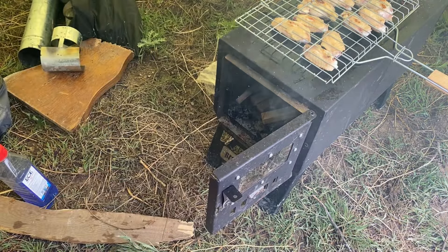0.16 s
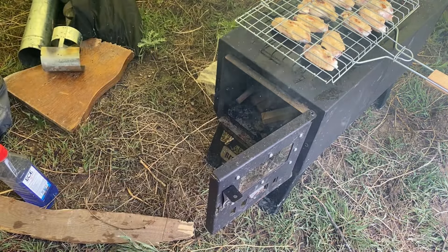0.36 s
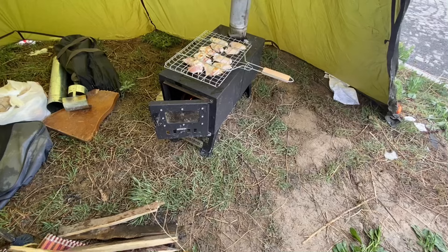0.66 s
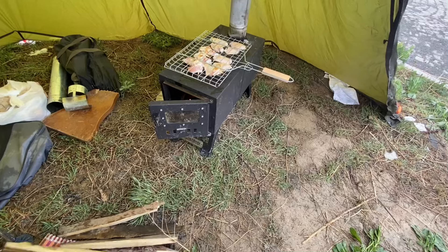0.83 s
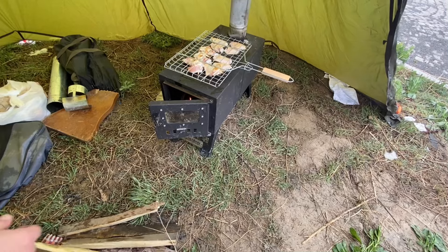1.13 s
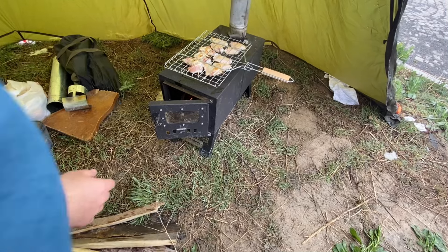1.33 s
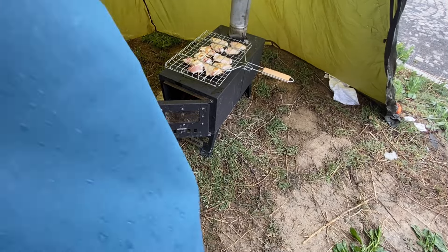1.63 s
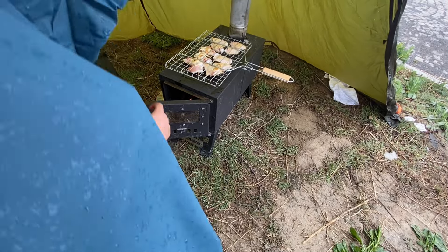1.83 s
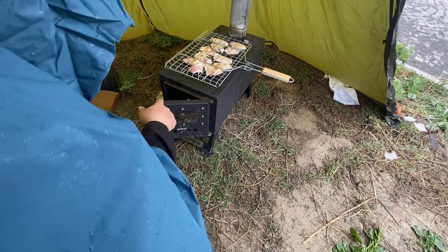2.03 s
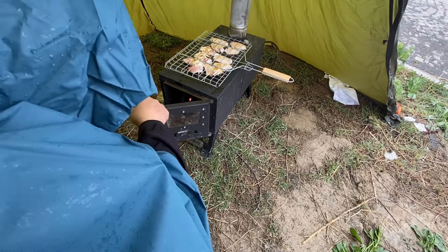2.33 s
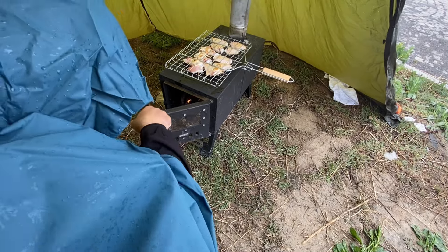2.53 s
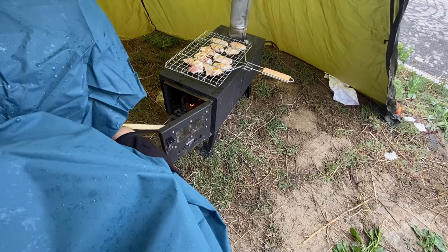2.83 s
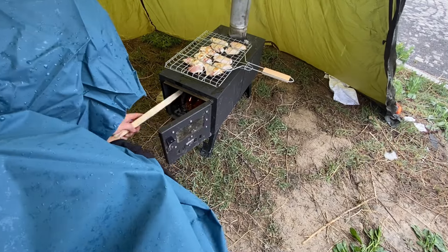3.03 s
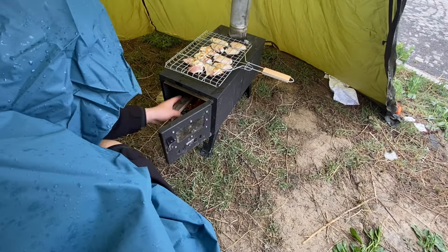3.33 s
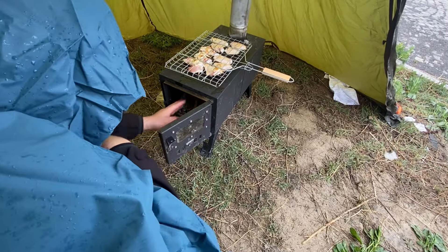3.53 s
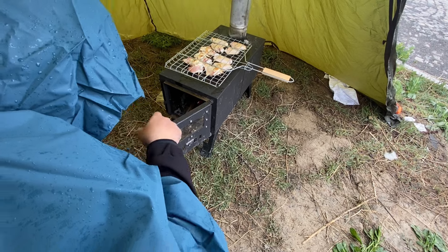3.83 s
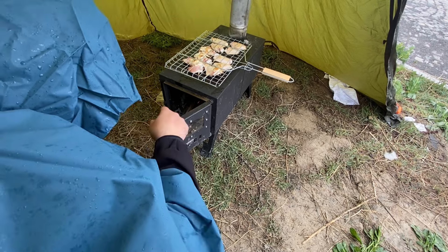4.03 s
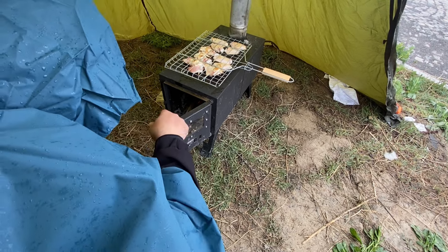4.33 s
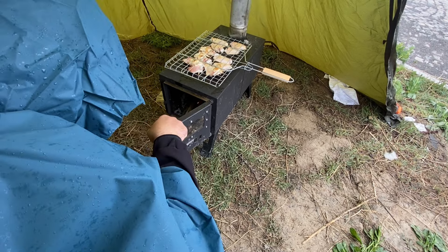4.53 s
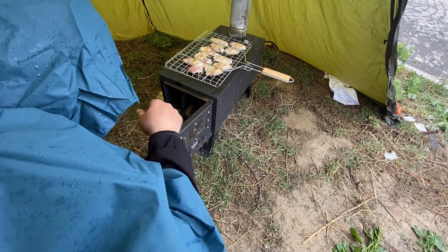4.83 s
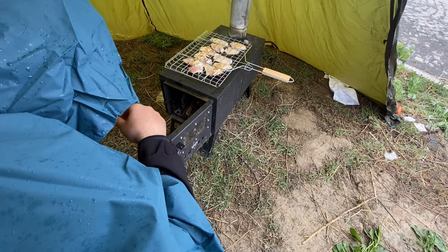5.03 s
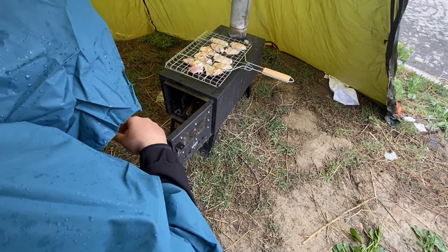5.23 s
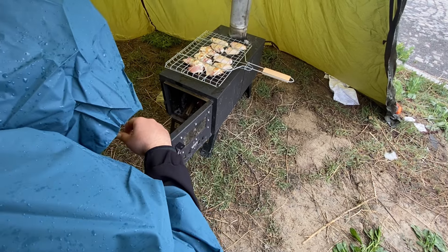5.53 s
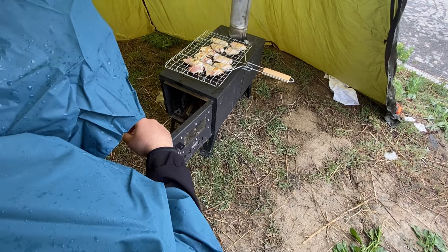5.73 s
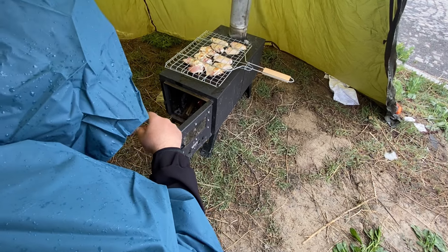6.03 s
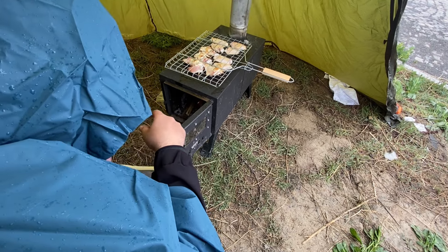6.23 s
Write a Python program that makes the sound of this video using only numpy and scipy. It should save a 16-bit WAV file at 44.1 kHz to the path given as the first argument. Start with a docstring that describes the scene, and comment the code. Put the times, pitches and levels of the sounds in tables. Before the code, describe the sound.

A very quiet opening of distant rain, with faint ticks on a tent, gives way abruptly at half a second to close, bright rain. Fat drops smack a stiff rain jacket amid fine patter and hiss. The jacket rustles and its folds snap as the wearer crouches; later a stick scrapes faintly and padded knocks sound on a hollow stove. Outdoors, close stereo camera microphone with soft handling bumps.

```python
"""Campsite: rain on a tent and on the rain jacket of someone who crouches to feed a small camp stove.
After a hush of distant rain it is close: bursting drops smack the jacket over random patter and noise hiss.
The jacket rustles as filtered noise, creases and snaps; moves shake the camera into rumble and soft bumps.
A hollow body, a bank of decaying modes, is knocked and rubbed; a stick of firewood scrapes briefly."""
import sys
import numpy as np
from scipy import signal
from scipy.fft import rfft, irfft, next_fast_len
from scipy.io import wavfile
from scipy.ndimage import uniform_filter1d, map_coordinates

SR = 44100
rng = np.random.default_rng(int(sys.argv[2]) if len(sys.argv) > 2 else 0)


def file_out(sig):
    """Save sig as 16-bit WAV at sys.argv[1]."""
    # one column per channel
    cols = np.atleast_2d(sig).T
    # limit, then scale
    lim = np.clip(cols, -1, 1)
    pcm = np.round(lim * 32767).astype(np.int16)
    wavfile.write(sys.argv[1], SR, pcm)


N = 281358
TIME = np.arange(N) / SR
RAIN_START_S = 0.56

# Small drops on cloth, spectrum. Each row: frequency in Hz, relative level in dB.
PATTER_SPECTRUM = [(200, -28.5), (700, -12.5), (1500, -7), (2500, -5.5), (5000, -2.5), (7400, 7), (9200, 1),
                   (12000, 0), (13200, -11), (16000, 1)]
# Sliding jacket cloth, spectrum. Each row: frequency in Hz, relative level in dB.
CLOTH_SPECTRUM = [(60, -75), (150, -2), (330, 3), (700, 4), (1100, 2.5), (1500, -3.5), (2500, -8),
                  (5000, -12.5), (12000, -89)]
# The wearer steps in, crouches and reaches for the stove. Each row: start in seconds, length in seconds,
# relative cloth level in dB, relative camera rumble level in dB.
MOVES = [(0.38, .12, -88, -59), (0.559, 0.2, -39, -58), (0.981, 0.13, -44, -55.5), (1.313, 0.64, -46, -57),
         (1.886, 0.068, -59, -71), (2.124, 0.14, -50, -64.5), (2.56, 0.08, -58, -85.5),
         (3.45, 0.22, -65, -62), (3.995, 0.41, -73, -64), (5.813, .11, -58.5, -62), (5.98, .3, -65, -68),
         (6.236, .16, -57.5, -57)]
# Modes of the hollow body. Each row: frequency in Hz, relative level in dB, t60 in seconds.
HOLLOW_MODES = [(67.3, -28, 0.43), (103, 3, 0.27), (125, 9.5, 0.14), (134, -1.5, 0.47), (179.9, 3, 0.4),
                (220, -14, 0.087), (262.3, -7.5, 0.76), (305, -2.5, 0.19), (339.4, -10.5, 0.71),
                (438, -27, 0.76)]


def amp(db):
    """Decibels to gain."""
    return 10 ** (np.asarray(db) / 20)


def unit(x):
    """Scales to rms 1."""
    return x / np.sqrt(np.mean(x ** 2) + 1e-20)


def read(points, hz):
    """Reads a spectrum on a log-frequency axis."""
    f, value = np.transpose(points)
    return np.interp(np.log(hz + 1), np.log(f), value)


def add(mix, s, sound):
    """Adds a stereo sound at time s."""
    part = mix[:, round(s * SR):][:, :sound.shape[-1]]
    part += sound[..., :part.shape[-1]]


def colour(x, points, size=2048):
    """Minimum-phase filter with the given spectrum, so that clicks keep their edge."""
    log_gain = np.log(amp(read(points, np.fft.rfftfreq(size, 1 / SR))))
    circle = np.concatenate([log_gain, log_gain[-2:0:-1]])
    taps = np.fft.ifft(np.exp(np.conj(signal.hilbert(circle)))).real[:size // 2]
    return signal.oaconvolve(x, taps[None], axes=1)[:, :x.shape[1]]


def tinted(x, depth_db, count=22):
    """Each spot of cloth favours its own frequencies."""
    tint = [(hz, depth_db * rng.standard_normal()) for hz in np.geomspace(600, 13000, num=count)]
    return colour(x, tint)


def ports(x, side, lead_ms):
    """Two microphone ports: a balance by frequency, and the left one hears first."""
    hz = np.fft.rfftfreq(next_fast_len(N + 100), 1 / SR)
    tilt = amp(read(side, hz) / 2)
    lag = np.exp(-2j * np.pi * hz * lead_ms / 1000)
    return irfft(rfft(x, 2 * (len(hz) - 1)) * np.array([tilt, lag / tilt]))[:, :N]


def noise_pair(same, size):
    """Two noises with a common share of power."""
    common, left, right = rng.standard_normal((3, size))
    same = np.clip(same, 0, 1)
    return np.sqrt(same) * common + np.sqrt(1 - same) * np.array([left, right])


def drift(per_s):
    """Random curve of rms 1: straight lines between per_s random values a second."""
    knots = rng.standard_normal(4096)
    return unit(map_coordinates(knots, [TIME * per_s], order=1, mode="wrap"))


def gesture(start, length, rise_s, fall_s):
    """Smooth attack, hold until the length is up, exponential release."""
    t = TIME - start
    rise = np.sin(np.pi / 2 * np.clip(t / rise_s, 0, 1)) ** 2
    return rise * np.exp(-np.maximum(t - length, 0) / fall_s)


def gestures(rows, rise_s, fall_s, rest_db=-120):
    """Gain of overlapping gestures (start, length, dB), summed in power over a resting level."""
    power = sum((amp(db) * gesture(s, length, rise_s, fall_s)) ** 2 for s, length, db in rows)
    return np.sqrt(amp(rest_db) ** 2 + power)


def wandering(x, depth_db, width_hz, hold_s, size=1024):
    """The colour of a steady sound wanders: narrow bands swell and sink at random."""
    hz, t, z = signal.stft(x, SR, nperseg=size)
    knots = rng.standard_normal((256, 256))
    at = np.meshgrid(hz / width_hz, t / hold_s, indexing="ij")
    field = map_coordinates(knots, at, order=1, mode="wrap")
    return signal.istft(z * unit(amp(depth_db * unit(field))), SR, nperseg=size)[1][:, :N]


def rain(rain_db=-44.5, hiss_db=-4, patter_db=-2, ticks_db=-8, flutter_db=1, waver_db=1.4, rise_s=0.098):
    """Hiss from tent and ground, patter, ticks and fat drops on the jacket; all but the last swell in flurries."""
    # Hiss spectrum. Each row: frequency in Hz, relative level in dB.
    hiss_spectrum = [(200, -13), (600, -23.5), (1550, -16.5), (2450, -6.5), (2730, -10), (3000, -2.5),
                     (3400, -9), (4400, -1), (6000, -3), (7400, 0.5), (9000, 1), (10000, -4.5), (12000, -7),
                     (13200, -41), (15500, -28)]
    # Stereo balance. Each row: frequency in Hz, left minus right in dB.
    rain_side = [(500, 4.5), (2000, -3.5), (5000, 1.5), (7000, 4), (9000, -5.5), (12000, -0.5),
                 (15000, -0.5)]
    # Flurries. Each row: start in seconds, length in seconds, level in dB relative to the steady fall.
    flurries = [(0.605, 0.34, 3.5), (1.047, .15, 0.5), (1.22, 0.17, 6.5), (1.462, 0.96, 1.5),
                (2.181, 0.051, 5), (2.312, 0.14, -1.5), (2.754, 0.39, 2), (4.036, 0.27, 4.5),
                (4.782, 0.66, 3), (5.596, 0.2, 2), (5.997, 0.23, 1)]
    hiss = unit(colour(noise_pair(0.13, N), hiss_spectrum)) * amp(flutter_db * drift(70))
    flurry_db = sum(db * gesture(s, length, rise_s=0.017, fall_s=0.025) for s, length, db in flurries)
    onset = np.clip((TIME - RAIN_START_S) / rise_s, 0, 1)
    strength = amp(rain_db + flurry_db + waver_db * drift(22)) * onset
    fine = reflected(amp(hiss_db) * hiss + amp(patter_db) * patter())
    fine = wandering(fine, depth_db=1.8, width_hz=230, hold_s=.12)
    return ports(fat_drops() + strength * (fine + amp(ticks_db) * ticks()), rain_side, lead_ms=0.034)


def fat_drops(splash_db=-24.5, slap_db=-12.5):
    """Near drops: a bright splash, and the slap of the cloth beneath it."""
    # Sharp ticks to long wet spatters. Each row: start in seconds, relative level in dB, left minus right in dB,
    # slap relative to splash in dB before slap_db and splash_db, burst length in seconds.
    drops = [(0.845, -19, 1.5, -18, 0.0089), (0.888, -18.5, 1, -20.5, 0.0087),
             (0.992, -21.5, 4, -22.5, 0.0099), (1.1, -32, -2, -20, 0.0045), (1.122, -28, 3, -20, 0.0048),
             (1.17, -12.5, -1.5, -23.5, 0.0064), (1.227, -34, 4, -13, .005), (1.286, -28, 5, -19, 0.0046),
             (1.333, -25, 6, -16.5, 0.0091), (1.36, -21.5, 4, -28, 0.0059), (1.524, -32, 7, -16, 0.0063),
             (1.617, -21, -1, -21.5, 0.011), (1.698, -19.5, 2, -21, 0.0096), (1.774, -31, -1, -22, .004),
             (1.891, -23, 0, -20, 0.0078), (1.953, -30, 6, -34, .0065), (2.115, -25, 0, -21.5, 0.0086),
             (2.177, -31, 6, -16, 0.0067), (2.388, -30.5, -7, -16, 0.0038), (2.396, -18, 1, -29, 0.0072),
             (2.439, -26.5, 2, -27, 0.01), (2.456, -22.5, -1, -28, .028), (2.504, -25, -1, -25, 0.011),
             (2.553, -31, -14, -29, 0.0047), (2.632, -28.5, -1, -16, 0.009),
             (2.667, -34, -8, -14.5, 0.0025), (2.697, -37, -2, -28, .006), (2.718, -28, -1, -25, 0.0092),
             (2.905, -23, 0, -22, 0.0041), (3.004, -24.5, -3, -26.5, .018), (3.033, -27, -4, -28, .008),
             (3.08, -19, -0.5, -21.5, 0.0086), (3.097, -25, 0, -26, 0.018), (3.138, -29, -1, -21, .012),
             (3.209, -29.5, 3, -18, 0.017), (3.252, -22.5, -1, -18, 0.0058), (3.33, -39, 6, -19, 0.0089),
             (3.398, -27, 1, -21, 0.018), (3.49, -39, -5, -22, .005), (3.566, -28, 2, -22, 0.012),
             (3.642, -26, 1, -16.5, 0.0076), (3.657, -27, -1, -23, 0.0061), (3.695, -22, 1, -24, 0.0088),
             (3.72, -19, 0, -25, 0.0069), (3.759, -30.5, -4, -20, 0.009), (3.821, -33.5, -1, -15, 0.0064),
             (3.835, -33.5, 1, -8.5, 0.0046), (3.876, -23.5, 2, -22, 0.0063), (4.03, -26.5, 2, -20, .011),
             (4.057, -22.5, 0.5, -16.5, 0.0078), (4.096, -22.5, -2, -19.5, 0.0056),
             (4.239, -23.5, 3, -15, 0.0048), (4.27, -31.5, -5, -15, 0.01), (4.316, -26, -1, -22, 0.026),
             (4.333, -24.5, 1, -16.5, 0.0094), (4.382, -34, -5, -26, 0.004),
             (4.407, -32.5, -1, -15.5, 0.0048), (4.44, -26, 0, -21.5, 0.023), (4.5, -26.5, 1.5, -27, 0.014),
             (4.517, -24.5, 0, -22, 0.012), (4.567, -31, -5, -26, 0.0055), (4.586, -27, -2, -22, 0.013),
             (4.646, -26.5, -1, -15, 0.034), (4.685, -27.5, -3, -16, 0.033), (4.72, -28, 0, -33, 0.0081),
             (4.739, -29, -2, -27, 0.0044), (4.784, -32.5, 3, -9, 0.0057), (4.813, -23.5, 2, -23, .006),
             (4.864, -25, 3, -32, 0.0078), (4.873, -28, -2, -24, .005), (4.93, -19, -1.5, -18.5, 0.0096),
             (5.107, -20.5, 2, -22.5, 0.0041), (5.259, -26.5, 2, -20.5, .009),
             (5.298, -19, -3, -18, 0.0056), (5.37, -25, 7, -22, .009), (5.504, -29.5, -1, -19.5, 0.0063),
             (5.534, -21.5, -4.5, -16, 0.0065), (5.591, -27, 1, -26, 0.021), (5.664, -22, -2, -30, .005),
             (5.676, -26, 3, -13.5, 0.0044), (5.685, -27.5, -4, -14.5, 0.012), (5.763, -37, -1, -11, 0.01),
             (5.806, -29.5, -3, -22, 0.0089), (5.879, -25.5, -1, -18.5, 0.05),
             (5.94, -22.5, -3, -18.5, 0.024), (6.004, -30, 6, -17, 0.0052),
             (6.022, -23.5, -6, -22.5, 0.004), (6.058, -25, 1, -19, 0.02), (6.074, -27.5, -6, -19, 0.0085),
             (6.118, -18, -2.5, -15.5, 0.0077), (6.169, -23, -6, -27, 0.0077),
             (6.33, -24, -1.5, -15.5, 0.0094), (6.365, -27, -6, -24, 0.0087)]
    # Splash. Each row: frequency in Hz, relative level in dB.
    splash_spectrum = [(300, -73), (1500, -3), (3000, -3), (5000, 17.5), (7400, 26), (9200, 23),
                       (12000, 11.5), (16000, 1)]
    # Cloth under a drop. Each row: frequency in Hz, relative level in dB.
    slap_spectrum = [(150, -3), (450, -6), (800, 2.5), (1400, 7.5), (2200, 13), (3500, 15.5), (6000, 8),
                     (12000, -27)]
    out = np.zeros((2, N))
    for s, db, pan_db, body_db, burst_s in drops:
        drop = tinted(splash(burst_s), depth_db=3.5)
        bright = amp(splash_db) * unit(colour(drop, splash_spectrum))
        slap = amp(slap_db + body_db) * unit(colour(drop, slap_spectrum))
        add(out, s, (bright + slap) * amp([[db + pan_db / 2], [db - pan_db / 2]]))
    return out


def splash(burst_s, crack_db=7, crack_s=0.000077, sharp_burst_s=0.0028, shade_db=-9, swell_s=0.011,
           tail_db=-18, tail_s=0.041, lumpy_db=2, same=0.44):
    """One drop: crack of contact, a few ms of bursting water, fine spray; the left port starts shaded."""
    t = np.arange(8000) / SR
    lumps = amp(lumpy_db * unit(uniform_filter1d(rng.standard_normal(len(t)), size=36)))
    # bursts longer than sharp_burst_s crack less
    crack = amp(crack_db) * min(sharp_burst_s / burst_s, 1) * np.exp(-t / crack_s)
    burst = np.exp(-(t / burst_s) ** 2)
    spray = amp(tail_db) * np.exp(-t / tail_s)
    shade = amp(shade_db * np.exp(-(t / swell_s) ** 2))
    shape = crack + lumps * (burst + spray)
    return noise_pair(same, len(t)) * np.array([unit(shape * shade), unit(shape)])


def patter(per_s=240, spread_db=2.5, tone_db=4.5, spray_db=-22, spray_s=0.17, same=0.34, size=1024, count=16):
    """Small drops, no two alike: each has its own size, length, place and tone."""
    at = np.flatnonzero(rng.random(N) < per_s / SR)
    t, hz = np.arange(size) / SR, np.fft.rfftfreq(size, 1 / SR)
    bands = np.log(np.geomspace(600, 14000, num=count))
    out = np.zeros((2, N))
    for i in at:
        weight = min(rng.exponential(1), 2.7)
        burst_s, pan_db = rng.uniform(.0005, .003), rng.uniform(-3, 3)
        shape = np.exp(-(t / burst_s) ** 2) + amp(spray_db) * np.exp(-t / spray_s)
        tone = amp(np.interp(np.log(hz + 1), bands, tone_db * rng.standard_normal(count)))
        drop = irfft(rfft(noise_pair(same, size) * shape) * unit(tone))
        add(out, i / SR, drop * amp(spread_db * weight + np.array([[pan_db], [-pan_db]])))
    return unit(colour(out, PATTER_SPECTRUM))


def ticks(per_s=45, spread_db=-1.0, decay_s=0.00024, tail_db=-24, tail_s=0.0092, count=16):
    """The smallest near drops do not burst: each gives one dry tick on the taut cloth."""
    t, out = np.arange(1024) / SR, np.zeros((2, N))
    for _ in range(count):
        level = amp(spread_db * np.minimum(rng.exponential(1, N), 2))
        hits = level * (rng.random(N) < per_s / count / SR)
        shape = np.exp(-t / decay_s) + amp(tail_db) * np.exp(-t / tail_s)
        tick = unit(tinted(noise_pair(0.7, len(t)) * shape, depth_db=4))
        out += signal.oaconvolve(hits[None], tick, axes=1)[:, :N]
    return unit(colour(out, PATTER_SPECTRUM))


def reflected(x, db=-9, first_ms=1.2, last_ms=14, count=6):
    """A few early echoes from the stove, the ground and the tent walls, different at each port."""
    out = x.copy()
    for ms in np.geomspace(first_ms, last_ms, num=count):
        for port in (0, 1):
            delay = 1 + int(ms * rng.uniform(.8, 1.2) * SR / 1000)
            out[port, delay:] += amp(db) / np.sqrt(count) * x[port, :-delay]
    return out / np.sqrt(1 + amp(db) ** 2)


def jacket(db=1.0, folds_db=4, clump_db=1.5, grain_db=1.0, slide_db=-3.0, crinkle_db=-3.0):
    """Stiff cloth, mostly to the left, slides and crinkles with each move; the sleeve swishes and folds snap."""
    # Stereo balance. Each row: frequency in Hz, left minus right in dB.
    cloth_side = [(100, 9), (300, 4), (600, 8.5), (1100, 3), (2500, -1), (8000, 11)]
    # Folds snapping over. Each row: start in seconds, relative peak level in dB.
    fold_times = [(.576, -40), (.623, -25), (.646, -31), (.674, -42), (.712, -29), (.726, -33),
                  (.751, -27.5), (.776, -35), (.797, -26), (.81, -36), (.8385, -28), (1.05, -37),
                  (1.937, -32), (1.96, -30.5), (1.972, -28.5), (1.994, -36), (2.222, -34), (2.262, -27.5),
                  (2.277, -33), (2.307, -27.5), (2.335, -34.5), (2.588, -41), (2.667, -40), (4.558, -39.5)]
    # Fold snap. Each row: frequency in Hz, relative level in dB.
    fold_spectrum = [(150, 2), (450, 0.5), (850, 16.5), (1300, 11), (2500, 0.5), (5000, -41),
                     (12000, -30.5)]
    # Quick swishes of wet sleeve. Each row: start in seconds, length in seconds, relative level in dB.
    swishes = [(.56, 0.24, -42), (.608, 0.026, -33)]
    # Wet sleeve. Each row: frequency in Hz, relative level in dB.
    sleeve_spectrum = [(400, -6), (1000, -5), (2000, 5.5), (4000, 3), (7000, 0.5), (9000, -4.5),
                       (12000, -27), (13500, -30), (16000, -28)]
    grain = amp(clump_db * drift(40) + grain_db * drift(600))
    slips = unit(colour(noise_pair(0.34, N) * grain, CLOTH_SPECTRUM))
    rows = [(s, length, cloth_db) for s, length, cloth_db, _ in MOVES]
    moving = gestures(rows, rise_s=0.049, fall_s=0.26, rest_db=-69.5) * (TIME > RAIN_START_S)
    cloth = amp(db) * moving * (amp(slide_db) * slips + amp(crinkle_db) * crinkles())
    cloth = wandering(cloth, depth_db=2.5, width_hz=165.0, hold_s=.08)
    folds = amp(folds_db) * snaps(fold_times, fold_spectrum, decay_s=0.0012)
    sleeve = unit(colour(noise_pair(0.29, N) * amp(1.3 * drift(550)), sleeve_spectrum))
    swish = gestures(swishes, rise_s=0.023, fall_s=0.054) * sleeve
    return ports(cloth + folds + swish, cloth_side, lead_ms=0.36)


def crinkles(per_s=170, spread_db=3.0, decay_s=0.0015, count=12):
    """Tiny creases popping in stiff cloth: sparse clicks, each crease with a tone of its own."""
    t, out = np.arange(1024) / SR, np.zeros((2, N))
    for _ in range(count):
        level = amp(spread_db * np.minimum(rng.exponential(1, N), 3))
        pops = level * (rng.random(N) < per_s / count / SR)
        crease = unit(tinted(noise_pair(0.88, len(t)) * np.exp(-t / decay_s), depth_db=7.0))
        out += signal.oaconvolve(pops[None], crease, axes=1)[:, :N]
    return unit(colour(out, CLOTH_SPECTRUM))


def snaps(rows, spectrum, decay_s, crack_db=8, crack_s=0.00013):
    """Short dry clicks of taut cloth: a sharp crack, then a brief flap."""
    out, t = np.zeros((2, N)), np.arange(2048) / SR
    for s, db in rows:
        shape = np.exp(-t / decay_s) + amp(crack_db) * np.exp(-t / crack_s)
        click = colour(noise_pair(0.28, len(t)) * shape, spectrum)
        add(out, s, amp(db) * click / abs(click).max())
    return out


def sleeve_crumple(grain_db=3.0, clump_db=2.5):
    """The jacket sleeve bunches up as the arm moves: a rasp in short crackling clumps."""
    # Each row: start in seconds, length in seconds, level in dB.
    crumples = [(2.2, .16, -47), (2.385, .05, -50.5), (2.47, .04, -57), (2.605, 0.026, -46),
                (2.65, 0.068, -51), (4.553, 0.0082, -48.5)]
    # Each row: frequency in Hz, relative level in dB.
    crumple_spectrum = [(200, -20), (450, -4), (720, 7), (1100, 4.5), (1600, -0.5), (2500, -1), (3600, -8),
                        (7000, -18), (12000, -11)]
    grain = amp(grain_db * drift(350) + clump_db * drift(70))
    rasp = unit(colour(noise_pair(0.45, N) * grain, crumple_spectrum))
    return gestures(crumples, rise_s=0.0095, fall_s=0.022) * rasp


def knocks(db=1, low_hz=85, onset_s=0.0032):
    """Padded blows on a hollow body; a longer contact gives a duller note, and the lows radiate poorly."""
    # Each row: start in seconds, relative level in dB, contact time in seconds.
    blows = [(3.514, -55, 0.0052), (3.637, -32, 0.0046), (3.65, -33, 0.015), (3.683, -41.5, 0.0014),
             (3.707, -53, 0.0015), (3.738, -39, 0.0048), (3.764, -44, 0.0014), (3.85, -49, 0.0034),
             (4.033, -52, 0.007), (4.154, -43.5, 0.0097), (4.239, -50.5, 0.0044)]
    out, t = np.zeros((2, N)), np.arange(SR) / SR
    for s, blow_db, contact_s in blows:
        ring = np.zeros(len(t))
        for hz, mode_db, t60 in HOLLOW_MODES:
            mode = amp(mode_db - 60 * t / t60) * np.sin(2 * np.pi * hz * t)
            ring += mode / (1 + (hz * contact_s) ** 2)
        add(out, s, amp(db + blow_db) * ring * (1 - np.exp(-(t / onset_s) ** 2)))
    radiated = signal.sosfilt(signal.butter(3, low_hz, "high", fs=SR, output="sos"), out)
    return ports(radiated, [(100, 0.67), (300, 0.33)], lead_ms=0.45)  # (Hz, left minus right dB)


def rubbing(rise_s=0.017, fall_s=0.1):
    """Friction, as noise, keeps the hollow body's modes humming."""
    # Each row: start in seconds, length in seconds, level in dB.
    rubs = [(3.5, 0.1, -65), (3.88, .65, -64), (5.97, 0.25, -59.5), (6.27, .12, -52.5)]
    t = np.arange(SR) / SR
    ring = sum(amp(mode_db - 60 * t / t60) * np.sin(2 * np.pi * hz * t) for hz, mode_db, t60 in HOLLOW_MODES)
    drone = unit(signal.oaconvolve(noise_pair(0.52, N), ring[None], axes=1)[:, :N])
    return gestures(rubs, rise_s, fall_s) * drone


def handling(rumble_db=1, click_decay_s=0.0035):
    """Low rumble as each move shakes the camera, with soft bumps of a brief damped swing and a dull click."""
    # Rumble. Each row: frequency in Hz, relative level in dB.
    rumble_spectrum = [(20, -41), (45, -6), (68, 9), (88, -0.5), (135, 4.5), (185, 5), (240, -15.5),
                       (500, -23), (3000, -51)]
    # Bumps. Each row: start in seconds, relative swing level in dB, pitch in Hz, swing time in seconds
    # (its envelope peaks at half of this), relative click level in dB, click cut-off in Hz.
    bumps = [(.449, -49, 133, 0.014, -36, 2400), (0.465, -40, 63.7, 0.012, -31.5, 2000),
             (0.526, -46.5, 271, 0.0092, -41, 420), (0.534, -48.5, 186, 0.014, -43, 420),
             (0.795, -38, 328, 0.014, -55, 900), (1.2, -46, 85, 0.028, -59, 900),
             (1.418, -42, 47.4, 0.018, -57, 900), (1.634, -36, 136, 0.011, -46, 900),
             (1.651, -41.5, 66.6, 0.015, -58, 900), (4.153, -35.5, 100, 0.0079, -43, 1200),
             (4.753, -52, 66.5, 0.026, -52, 700)]
    click_spectrum = [(100, 2.5), (500, 2), (1700, -9.5), (3000, -22), (9000, -55)]  # (Hz, dB)
    side = [(30, 11.0), (70, 13.4), (140, 6.1), (500, 8.3)]  # (Hz, left minus right dB)
    rows = [(s, length, shake_db) for s, length, _, shake_db in MOVES]
    shake = gestures(rows, rise_s=0.07, fall_s=0.39, rest_db=-72.5)
    out = amp(rumble_db) * shake * unit(colour(noise_pair(0.66, N), rumble_spectrum, size=8192))
    t = np.arange(SR // 5) / SR
    for s, db, hz, swing_s, click_db, cut_hz in bumps:
        envelope = 2 * t / swing_s * np.exp(1 - 2 * t / swing_s)
        push = np.sin(2 * np.pi * hz * t) * envelope
        click = colour(noise_pair(0.6, len(t)) * np.exp(-t / click_decay_s), click_spectrum)
        click = signal.sosfilt(signal.butter(3, cut_hz, fs=SR, output="sos"), click)
        add(out, s, amp(db) * push + amp(click_db) * click / abs(click).max())
    return ports(out, side, lead_ms=0.26)


def firewood(start_s=3.457, length_s=.028, level_db=-56):
    """A stick scrapes into the stove: brief gritty noise through the resonance of the wood."""
    # Each row: frequency in Hz, relative level in dB.
    wood_spectrum = [(500, -13), (1200, 1), (1400, 10), (1560, -11), (1900, -23), (4000, -46)]
    push = amp(level_db) * gesture(start_s, length_s, rise_s=0.01, fall_s=0.017)
    return push * unit(colour(noise_pair(1.0, N) * amp(1.6 * drift(400)), wood_spectrum))


def sizzle(start_s=0.14, length_s=0.069, level_db=-68):
    """A soft spit of fat on the grill: a short swell of high noise."""
    # Each row: frequency in Hz, relative level in dB.
    sizzle_spectrum = [(3000, -32), (4400, -3), (5100, 10), (6200, -12), (8000, -30)]
    swell = amp(level_db) * gesture(start_s, length_s, rise_s=.05, fall_s=0.045)
    return swell * unit(colour(noise_pair(0.3, N), sizzle_spectrum))


def tent_ticks():
    """Faint drops on the taut tent during the hush: short clicks."""
    # Each row: start in seconds, peak level in dB.
    tick_times = [(.058, -49), (.336, -40.5), (.397, -44.5)]
    # Each row: frequency in Hz, relative level in dB.
    tick_spectrum = [(300, -18), (1200, -6), (3000, -2), (4500, -12), (7000, -13), (10000, -35)]
    return snaps(tick_times, tick_spectrum, decay_s=0.0046)


def hush(level_db=-63.5):
    """Distant rain: steady noise with a slight flutter."""
    # Each row: frequency in Hz, relative level in dB.
    hush_spectrum = [(24, -18), (45, -11), (68, -4.5), (90, 2), (140, -34.5), (260, -9), (430, -11.5),
                     (1200, -14.5), (3500, -15), (5100, -15.5), (6600, -17.5), (8800, -41), (11000, -28),
                     (13000, -44)]
    flutter = amp(0.48 * drift(220) + 0.47 * drift(34))
    return amp(level_db) * unit(colour(noise_pair(0.2, N) * flutter, hush_spectrum))


def scene():
    """All sources over the hush of distant rain."""
    wearer = jacket() + sleeve_crumple() + handling()
    stove = knocks() + rubbing() + firewood() + sizzle()
    return rain() + wearer + stove + tent_ticks() + hush()


def record(dry, low_cut_hz=28, edge_hz=16100):
    """The recorder's low cut and band limit."""
    dry = signal.sosfilt(signal.butter(3, low_cut_hz, "high", fs=SR, output="sos"), dry)
    taps = signal.firwin(511, edge_hz, window=("kaiser", 9), fs=SR)
    return signal.oaconvolve(dry, taps[None], "same")


dry = scene()
out = record(dry)
file_out(out)
```